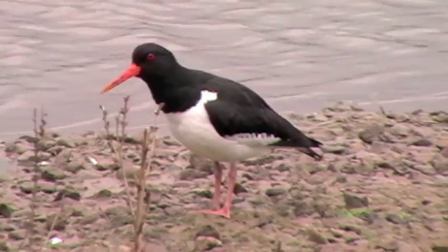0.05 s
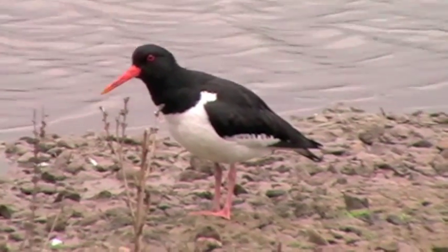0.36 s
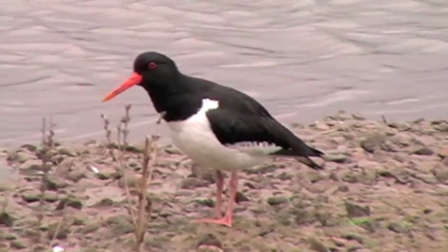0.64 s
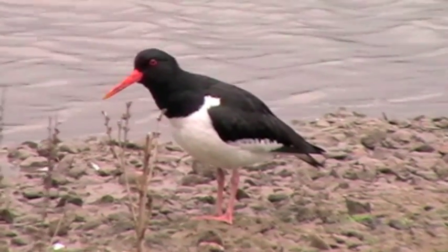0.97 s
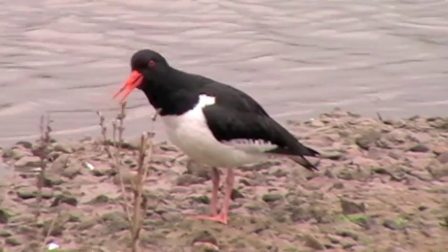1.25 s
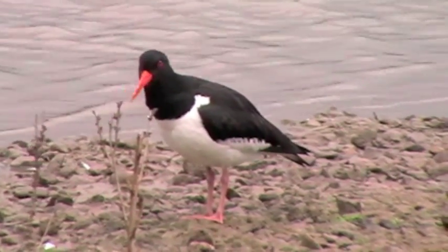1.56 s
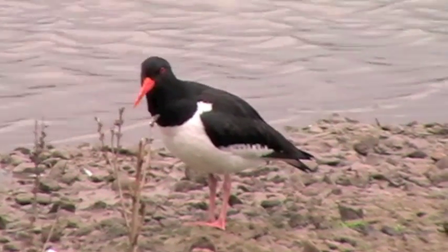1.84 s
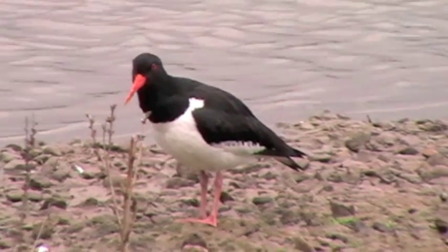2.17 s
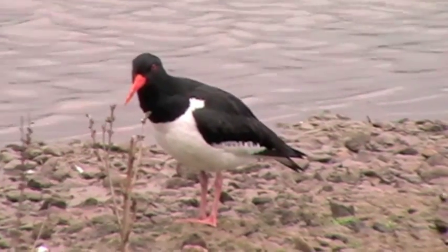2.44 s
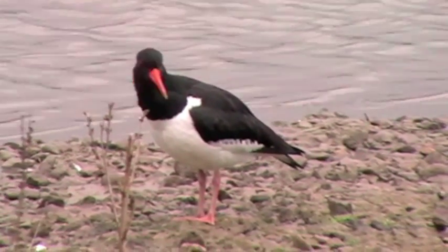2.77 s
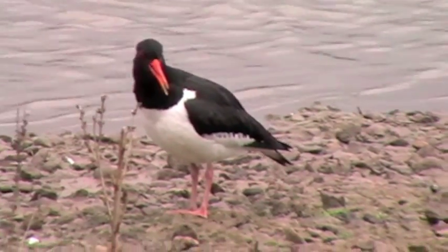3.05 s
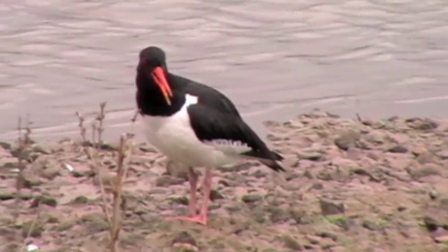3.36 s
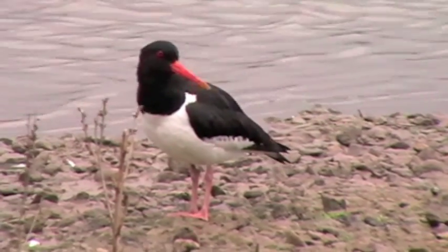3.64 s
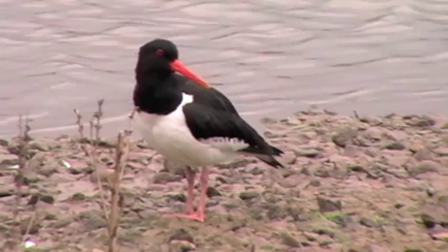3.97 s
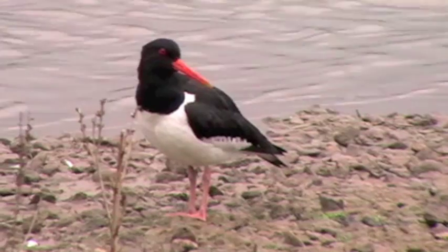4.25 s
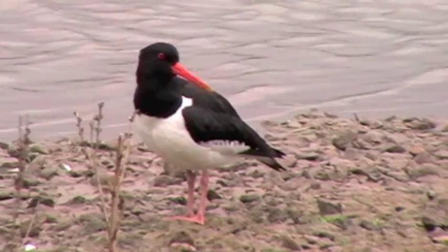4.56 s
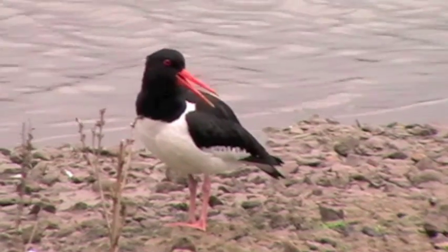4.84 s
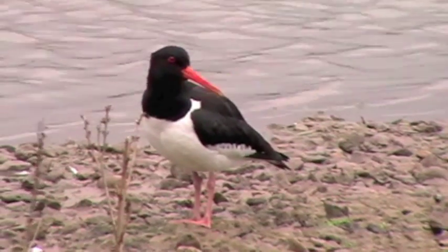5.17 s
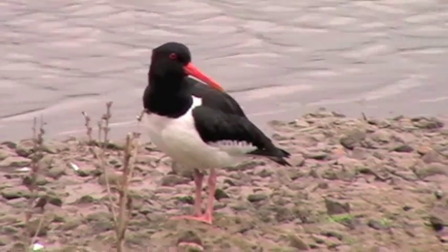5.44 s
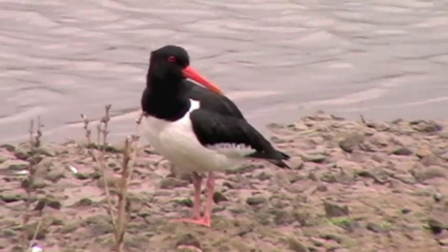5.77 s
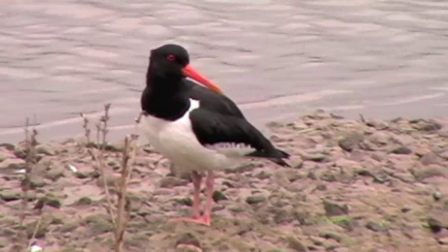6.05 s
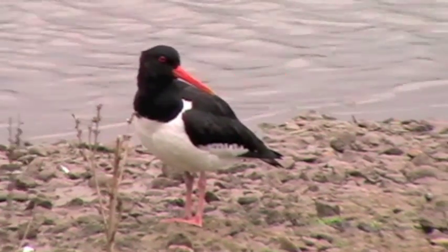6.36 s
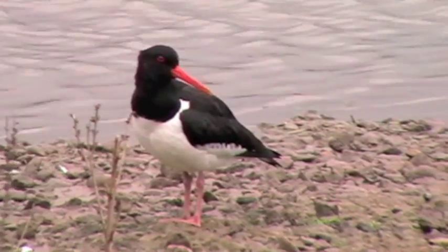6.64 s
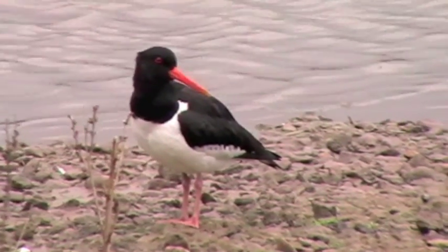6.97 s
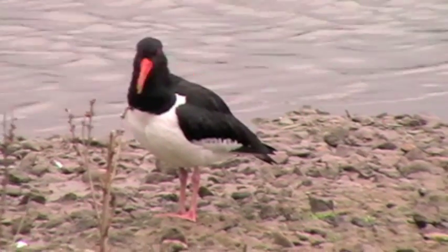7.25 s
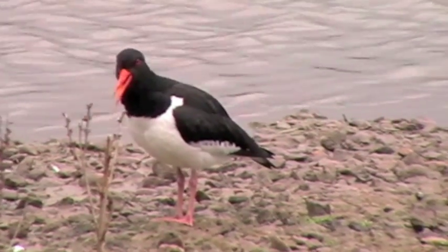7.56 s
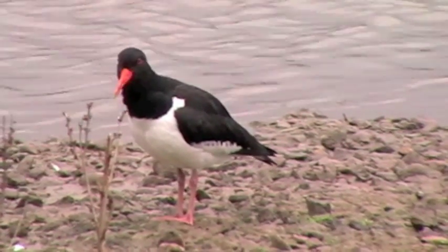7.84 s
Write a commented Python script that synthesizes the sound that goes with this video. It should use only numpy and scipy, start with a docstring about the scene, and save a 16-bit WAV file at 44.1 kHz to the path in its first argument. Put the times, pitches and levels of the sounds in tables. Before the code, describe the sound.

Faint twittering of small birds and a quiet wash of water fill an open shoreline, with a few blurred calls far away. Close to the microphone, a shorebird breaks in with one sharp, clear, rising and falling peep, then repeats it three times with pauses between. Its calls are much louder than everything else and echo briefly. Light wind hisses softly and faintly buffets the microphone near the end.

```python
"""An oystercatcher on a stony shore

The bird pipes four times: each note slides up, flips into a higher register (a higher way of singing),
arches and drops back, and the banks scatter it as an echo. Far-off songbirds whistle and trill in almost
pure tones. Behind them, noise makes the wash of water and a light breeze that buffets the microphone,
most of all at the end."""
import sys
import numpy as np
from scipy import signal
from scipy.fft import rfft, irfft
from scipy.io import wavfile
from scipy.ndimage import uniform_filter1d

SR = 44100
rng = np.random.default_rng(int(sys.argv[2]) if len(sys.argv) > 2 else 0)


def inscribe(sig):
    """Save sig as 16-bit PCM at rate SR to the path in sys.argv[1].

    A 1-D sig is mono; a 2-D sig holds one channel per row.
    Samples are clipped to [-1, 1] before scaling.
    """
    pcm = np.round(np.clip(np.atleast_2d(sig).T, -1, 1) * 32767)
    wavfile.write(sys.argv[1], SR, pcm.astype(np.int16))


N = 348377
T = np.arange(N) / SR

# tone colour of the water and distant air: (frequency [Hz], relative level [dB])
WATER_COLOUR = [(15, -53), (33, -23), (60, -9.5), (115, -12.5), (165, -6), (230, -3.5), (370, -5.5),
                (650, -1), (1400, -2.5), (1950, -9.5), (4500, -13), (8500, -21), (10500, -31), (15500, -38)]
# strength of the breeze: (time [s], hiss [dB], buffeting [dB])
BREEZE_LEVELS = [(0, -51, -93), (.7, -50.5, -97), (3, -54.5, -77), (4.3, -56.5, -85), (5.7, -61, -73.5),
                 (6.7, -65.5, -68.5), (7.2, -63, -62.5)]
# tone colours of that hiss and buffeting: (frequency [Hz], relative level [dB])
HISS_COLOUR = [(1200, -5.5), (2500, 1), (4500, 0.5), (7000, -3), (9000, -7.5), (11000, -17.5), (15000, -36)]
BUFFET_COLOUR = [(15, -25), (45, -3.5), (100, 0.5), (200, -9), (600, -54), (3000, -90)]
# tone colour of the shore's echo: (frequency [Hz], relative level [dB])
ECHO_COLOUR = [(2350, 1), (2900, 1), (4000, 7.5), (4750, 5.5), (5700, -7), (7200, -2), (12000, -4)]
# very distant calls: (start [s], length [s], pitch [Hz], blur width [Hz], level [dB])
DISTANT_CALLS = [(0, 0.062, 2650, 405, -48), (0, .2, 1743, 356, -55.5), (.58, 0.21, 1352, 296, -54.5),
                 (1.62, 0.22, 461, 92.6, -57.5), (1.66, 0.37, 1694, 402, -53),
                 (1.96, 0.58, 470, 110.3, -58), (7.5, 0.41, 851, 215.7, -56)]
# songbirds' single notes and trills:
# (start [s], length [s], first pitch [Hz], middle pitch [Hz], last pitch [Hz], level [dB])
SONG_NOTES = [(0.55, 0.089, 2710, 1763, 1280, -48.5), (1.263, 0.029, 1600, 1606, 1480, -44),
              (1.838, 0.14, 4420, 4520, 3240, -49.5), (1.867, 0.078, 3890, 3600, 3560, -49.5),
              (2.393, .018, 4600, 4870, 5300, -47.5), (2.425, 0.012, 4840, 5040, 5300, -47),
              (2.571, 0.016, 4280, 4500, 4600, -44.5), (2.595, .02, 3940, 3460, 2270, -46),
              (2.672, 0.029, 4270, 4900, 5600, -50), (2.74, 0.11, 5460, 3830, 3550, -55.5),
              (3.747, 0.078, 3900, 3580, 3490, -53), (4.395, 0.03, 3680, 3480, 3380, -51),
              (6.189, .021, 4530, 4300, 4060, -49.5), (7.743, 0.045, 3940, 4170, 4500, -44)]
SONG_TRILLS = [(.237, .12, 4360, 4140, 3950, -53.5), (0.467, 0.1, 5100, 5000, 4850, -51),
               (0.653, 0.13, 4300, 2880, 3020, -51), (0.918, .31, 3970, 4600, 3580, -53.5),
               (1.264, .065, 3180, 3570, 3220, -50.5), (1.695, 0.088, 4080, 4230, 4370, -50),
               (2.05, 0.1, 4310, 4260, 3960, -53), (2.187, .12, 3870, 3730, 3410, -47.5),
               (2.44, .08, 3500, 3700, 2670, -52), (2.994, 0.36, 4400, 3750, 2760, -58),
               (3.808, .17, 4440, 4140, 3280, -56), (4.33, 0.2, 4300, 3320, 2744, -56.5),
               (5.249, 0.25, 4450, 4274, 4190, -51.5), (6.755, .14, 4680, 4460, 4200, -51.5),
               (6.819, 0.24, 3770, 3200, 2600, -57.5), (6.933, 0.14, 4300, 4240, 4370, -54.5),
               (7.148, 0.12, 3150, 3080, 3230, -54.5)]
# songbirds' thin falling slurs, long upward scoops and two-part chips: (start [s], level [dB])
SONG_SLURS = [(4.1, -55), (5.967, -53), (6.235, -51.5), (6.526, -51), (7.175, -53.5), (7.269, -49.5),
              (7.368, -52.5), (7.465, -57.5)]
SONG_SCOOPS = [(5.636, -50), (7.25, -55)]
SONG_CHIPS = [(4.15, -51), (6.038, -48), (6.094, -45.5), (6.306, -47.5), (6.589, -43), (6.648, -46.5)]
# how the oystercatcher's throat and bill shape its overtones: (frequency [Hz], relative level [dB])
THROAT_COLOUR = [(5500, -24), (6500, -15), (7250, -8), (7700, -14), (8300, -18.5), (9000, -28), (9800, -27),
                 (11700, -30.5), (13000, -39), (14600, -34), (15500, -61)]
# its notes; the crest is the top of the arch, and the last four columns set the high register:
# (start [s], flip up [s], crest [s], flip down [s], end [s], crest pitch [Hz], sag before the crest
#  [share of crest pitch], base tone [dB], octave [dB], bloom [dB], overtone boost [dB])
PIPING_NOTES = [(1.411, 1.442, 1.508, 1.611, 1.636, 2933, .079, -17.5, -21, 3, 1),
                (3.299, 3.335, 3.407, 3.494, 3.535, 2903, .088, -18.7, -20, 4.5, 1.2),
                (4.983, 5.018, 5.095, 5.182, 5.215, 2915, .074, -17.5, -28.4, 1.5, -4.5),
                (7.586, 7.615, 7.688, 7.811, 7.836, 2960, .102, -21.3, -19.5, 5, 0)]


def undb(db):
    """Turn decibels into a number to multiply a sound by."""
    return 10 ** (np.asarray(db) / 20)


def unit(x):
    """Scale a sound to an average strength (rms) of 1."""
    return x / np.sqrt(np.mean(x ** 2))


def curves(table, t):
    """Join the values in each column of a table by straight lines in time."""
    times, *columns = np.transpose(table)
    return [np.interp(t, times, column) for column in columns]


def colour(points, hz):
    """How strongly a tone colour lets the given frequencies through."""
    frequencies, db = np.transpose(points)
    return undb(np.interp(np.log(hz + 1), np.log(frequencies), db))


def shaped(x, points):
    """Give a sound a tone colour."""
    return irfft(rfft(x) * colour(points, np.fft.rfftfreq(len(x), 1 / SR)), len(x))


def noise(points):
    """Noise of strength 1 with a given tone colour."""
    return unit(shaped(rng.standard_normal(N), points))


def walk(rate, size=N):
    """A smooth random wobble of size near 1, with about `rate` turns a second."""
    hold = max(int(SR / rate), 1)
    steps = np.repeat(rng.standard_normal(size // hold + 2), hold)
    return 1.3 * uniform_filter1d(uniform_filter1d(steps, hold), hold)[:size]


def phase_of(hz):
    """How far a wave has turned, in radians, as its pitch moves."""
    return 2 * np.pi * np.cumsum(hz) / SR


def add(out, start, x):
    """Mix a sound in at a start time in seconds."""
    i = max(int(start * SR), 0)
    out[i:i + len(x)] += x[:len(out) - i]


def water(level_db=-50.5, swell_db=0.7):
    """The wash of water: noise in octave-wide bands that each swell a little on their own."""
    spectrum = rfft(noise(WATER_COLOUR))
    octave = np.log2(np.clip(np.fft.rfftfreq(N, 1 / SR), 32, 16384))
    wash = np.zeros(N)
    for centre in range(5, 15):
        band = irfft(spectrum * np.maximum(1 - np.abs(octave - centre), 0), N)
        wash += band * undb(-swell_db * walk(7.9))
    return undb(level_db) * wash


def breeze():
    """Wind makes ripples and stalks hiss, and rumbles as it buffets the microphone."""
    hiss_db, buffet_db = curves(BREEZE_LEVELS, T)
    hiss = noise(HISS_COLOUR) * undb(hiss_db + walk(5.73))
    buffet = noise(BUFFET_COLOUR) * undb(buffet_db + 2 * walk(11))
    return hiss + buffet


def bank_echo(x, stones_db, bank_db, stones_s, bank_s):
    """Quick scatter from stones and a faint tail from the far bank; each fades 60 dB in its given time."""
    t = T[:SR]
    stones, bank = rng.standard_normal((2, SR))
    stones = shaped(stones, ECHO_COLOUR) * undb(-60 * t / stones_s) * (1 - np.exp(-t / 0.0022))
    bank = shaped(bank, ECHO_COLOUR) * undb(-60 * t / bank_s) * (1 - np.exp(-t / 0.024))
    response = (undb(stones_db) * unit(stones) + undb(bank_db) * unit(bank)) / np.sqrt(SR)
    return signal.fftconvolve(x, response)[:N]


def distant_calls():
    """Calls from across the water, blurred by echo into soft, narrow bands of noise."""
    out = np.zeros(N)
    for start, length, hz, width_hz, db in DISTANT_CALLS:
        size = int(length * SR)
        blur = walk(2 * width_hz, size) + 1j * walk(2 * width_hz, size)
        call = np.real(blur * np.exp(1j * phase_of(np.full(size, hz))))
        add(out, start, undb(db) * unit(call * signal.windows.tukey(size, .5)))
    return out


def glide(length, pitches, edges=0.26):
    """A pitch curve through the given pitches, and a fade in and out to go with it."""
    progress = np.linspace(0, 1, int(length * SR))
    bend = np.polyfit(np.linspace(0, 1, len(pitches)), pitches, len(pitches) - 1)
    return np.polyval(bend, progress), signal.windows.tukey(len(progress), edges)


def note(length, pitches, waver=.013, flutter_db=5.5):
    """One almost pure note, unsteady in pitch and loudness."""
    hz, fade = glide(length, pitches)
    hz *= 1 + waver * walk(450, len(hz))
    flutter = undb(flutter_db * walk(53, len(hz)))
    return unit(fade * flutter * np.sin(phase_of(hz)))


def trill(length, pitches, pips_per_s, sweep=0.14, waver=0.028):
    """An even run of quick pips, each flicking downward."""
    hz, fade = glide(length, pitches, edges=0.084)
    cycle = pips_per_s * np.arange(len(hz)) / SR % 1
    pips = np.sin(np.pi * cycle) ** 6 * undb(2 * walk(26.5, len(hz)))
    hz *= 1 + sweep * (.5 - cycle) + waver * walk(500, len(hz))
    return unit(fade * pips * np.sin(phase_of(hz)))


def twitter(count=90, db=-62, centre_hz=3800, spread=0.31, droop=0.14, length_s=0.055, waver=0.025):
    """The faintest birdsong: a scatter of short, rough, mostly falling chirps."""
    out = np.zeros(N)
    for k, (when, pitch, bend, slope, span, loud) in enumerate(rng.uniform(-1, 1, (count, 6))):
        fall = droop * (.5 + slope)
        pitches = centre_hz * np.exp(spread * pitch + np.array([fall, droop * bend / 2, -fall]))
        hz, fade = glide(length_s * 2 ** span, pitches)
        hz *= 1 + waver * walk(500, len(hz))
        start = (k + .5 + when / 2) / count * N / SR
        add(out, start, undb(db + 2 * loud) * unit(fade * np.sin(phase_of(hz))))
    return out


def trills():
    """Far songbirds trill, all at one pace and mostly falling in pitch."""
    out = np.zeros(N)
    for start, length, *pitches, db in SONG_TRILLS:
        add(out, start, undb(db) * trill(length, pitches, pips_per_s=45))
    return out


def whistles():
    """Far songbirds whistle single notes, repeated slurs and long scoops."""
    out = np.zeros(N)
    for start, length, *pitches, db in SONG_NOTES:
        add(out, start, undb(db) * note(length, pitches))
    for start, db in SONG_SLURS:
        add(out, start, undb(db) * note(length=.027, pitches=(5300, 4800, 4450)))
    for start, db in SONG_SCOOPS:
        add(out, start, undb(db) * note(length=.185, pitches=(3125, 3050, 3720), waver=.0072))
    return out


def chips(note_s=.022, burr_db=-6.5):
    """A far bird's two-part call: a short note breaks into a lower, softer burr."""
    out = np.zeros(N)
    for start, db in SONG_CHIPS:
        add(out, start, undb(db) * note(note_s, pitches=(3630, 3624, 3460)))
        burr = trill(length=.0303, pitches=(3066, 2940, 2890), pips_per_s=77)
        add(out, start + note_s, undb(db + burr_db) * burr)
    return out


def registers(stage, low, high, flip_s=0.0033):
    """The voice flips quickly from `low` to `high` at stage 1 of a note, and back at stage 3."""
    return uniform_filter1d(np.where(np.abs(stage - 2) > 1, low, high), int(flip_s * SR))


def pipe_pitch(stage, sag_before, sag_after=.11, end_pitch=.58, flip_pitch=.83):
    """Pitch as a share of the crest pitch: a slide in, a round arch up high, a slide out."""
    rising, from_crest = stage < 2, np.abs(stage - 2)
    slide = end_pitch + (flip_pitch - end_pitch) * (2 - from_crest) ** np.where(rising, .51, .3)
    arch = 1 - np.where(rising, sag_before, sag_after) * from_crest ** 1.85
    return registers(stage, slide, arch)


def pipe_levels(stage, pitch, base_db, octave_db, bloom_db, boost_db):
    """Levels of the base tone and its octave, and the overtone boost, through one note."""
    from_crest = np.abs(stage - 2)
    # just under the crest the tone blooms: the base tone gains, mostly going down, and the octave loses
    bloom = bloom_db * np.exp(-((1 - pitch - .052) / .027) ** 2)
    high_base_db = base_db + bloom * np.where(stage < 2, .25, 1) - 3 * from_crest ** 4
    return (registers(stage, low=-20, high=high_base_db),
            registers(stage, low=-29 - 9 * (from_crest - 1), high=octave_db - 1.75 * bloom),
            registers(stage, low=2, high=boost_db))


def pipe(times, crest_hz, sag_before, levels, rise=0.8, fall=0.59, strain_db=-0.5):
    """One piping note: a clean stack of harmonics, slightly hoarser in the low register."""
    t = np.arange(times[0], times[-1], 1 / SR)
    stage = np.interp(t, times, np.arange(len(times)))  # 0 start, 1 flip up, 2 crest, 3 flip down, 4 end
    low = np.abs(stage - 2) > 1
    quiver = np.where(low, .004, .0009) * walk(1100, len(t))
    wander = .002 * walk(70, len(t))
    pitch = pipe_pitch(stage, sag_before)
    hz = crest_hz * pitch * (1 + quiver + wander)
    phase = phase_of(hz)
    base_db, octave_db, boost_db = pipe_levels(stage, pitch, *levels)
    swell = np.sin(np.pi / 2 * np.clip(stage / rise, 0, 1)) ** 2
    swell *= np.clip((stage[-1] - stage) / fall, 0, 1)
    # the level dips slightly as pressure builds before the flip up
    swell *= undb(strain_db * np.exp(-((stage - .85) / .17) ** 2))
    voice = swell * (undb(base_db) * np.sin(phase) + undb(octave_db) * np.cos(2 * phase))
    # the overtones grow with the octave and come in early: the bird's membranes start with a buzz
    brightness = swell ** .27 * undb(boost_db + base_db + .52 * (octave_db - base_db + 2.5))
    for harmonic in range(3, 8):
        flutter = undb(2.2 * walk(269, len(t)))
        voice += brightness * flutter * colour(THROAT_COLOUR, harmonic * hz) * np.sin(harmonic * phase)
    return np.sqrt(2) * voice


def oystercatcher():
    """The near bird pipes four times, its voice made by vibrating membranes."""
    out = np.zeros(N)
    for start, up, crest, down, end, crest_hz, sag_before, *levels in PIPING_NOTES:
        add(out, start, pipe((start, up, crest, down, end), crest_hz, sag_before, levels))
    return out


def scene():
    """Mix the birds, their echoes, the water and the breeze into one channel."""
    piping = oystercatcher()
    song = whistles() + chips() + trills() + twitter()
    piping_echo = bank_echo(piping, stones_db=-15, bank_db=-23, stones_s=0.25, bank_s=0.63)
    song_echo = bank_echo(song, stones_db=-15, bank_db=-25, stones_s=0.15, bank_s=1.0)
    background = distant_calls() + water() + breeze()
    return (background + song + song_echo + piping + piping_echo)[None]


def record(dry):
    """A steep filter cuts the highest treble, above 15300 Hz."""
    return signal.sosfilt(signal.ellip(10, .1, 80, 15300, fs=SR, output="sos"), dry)


dry = scene()
out = record(dry)
inscribe(out)
```